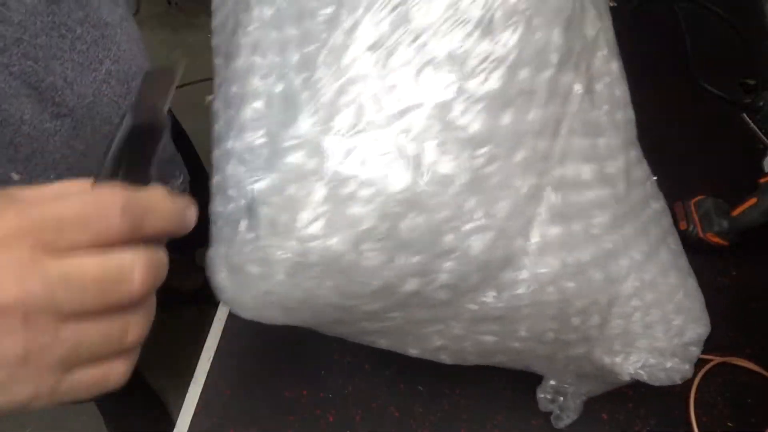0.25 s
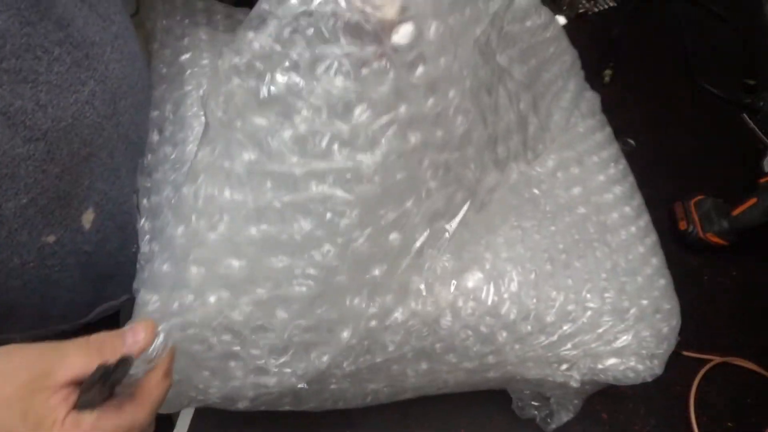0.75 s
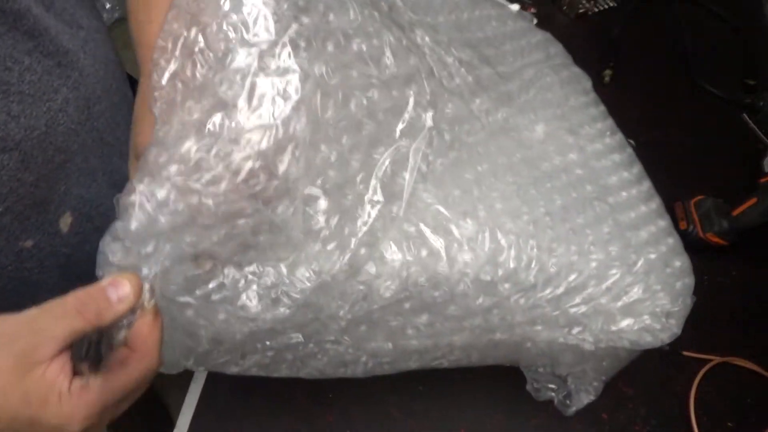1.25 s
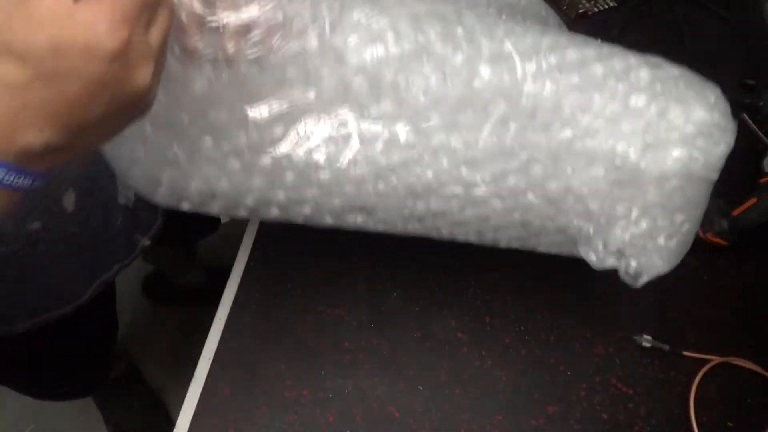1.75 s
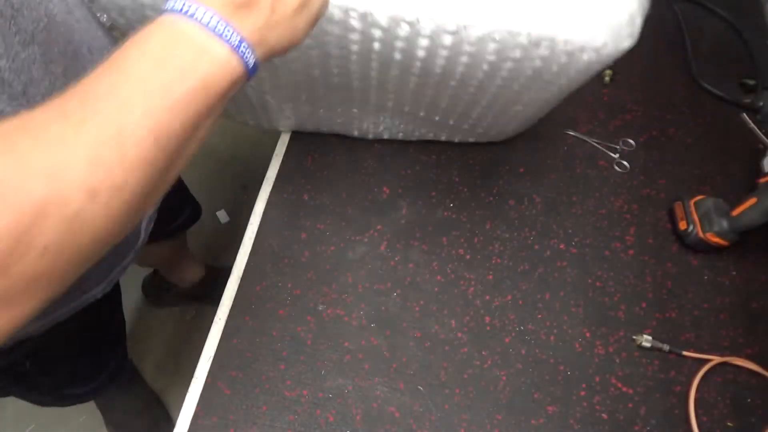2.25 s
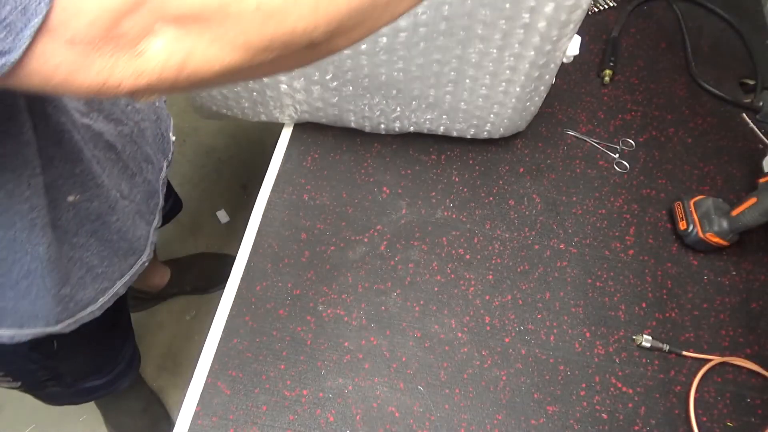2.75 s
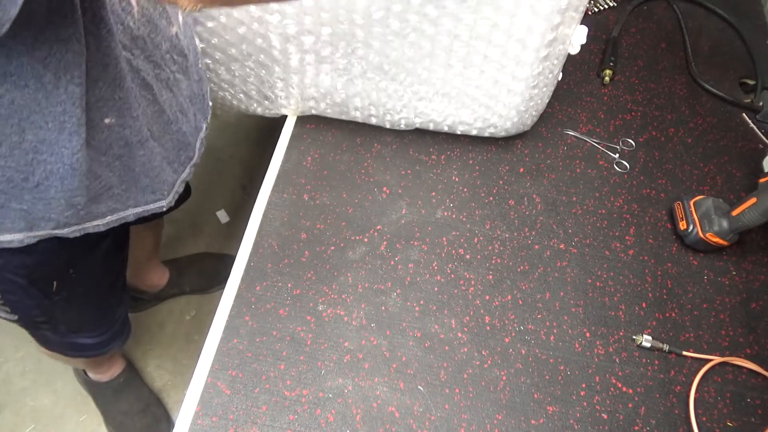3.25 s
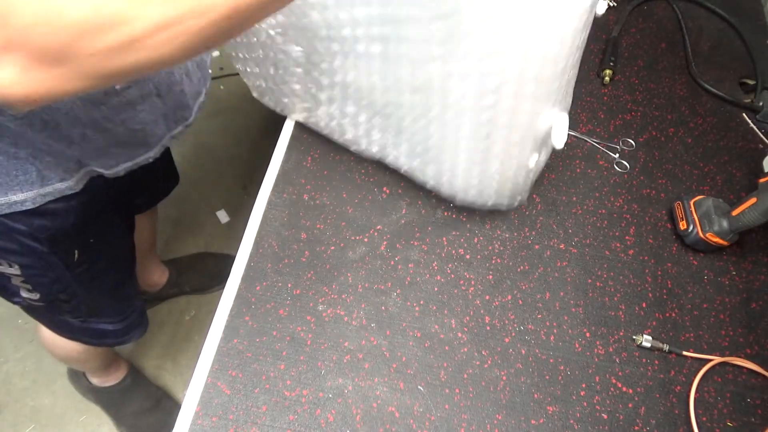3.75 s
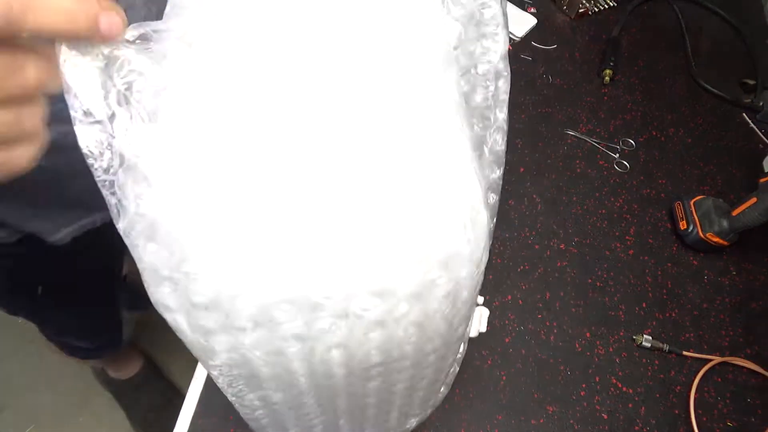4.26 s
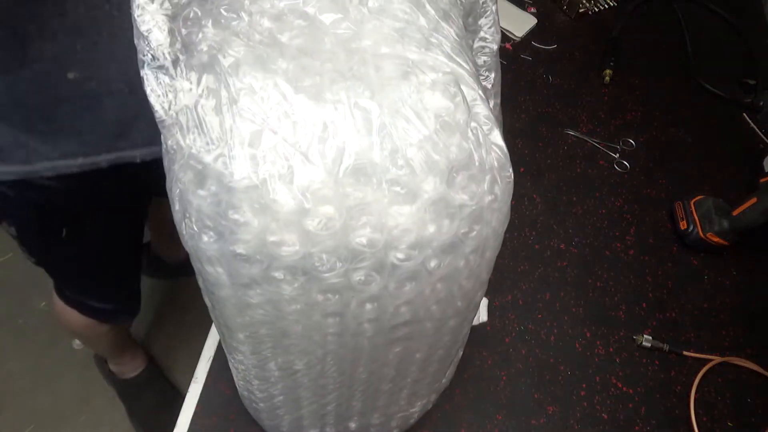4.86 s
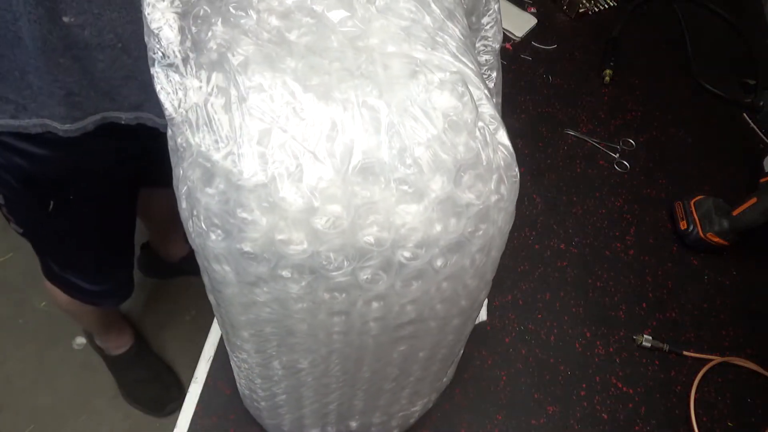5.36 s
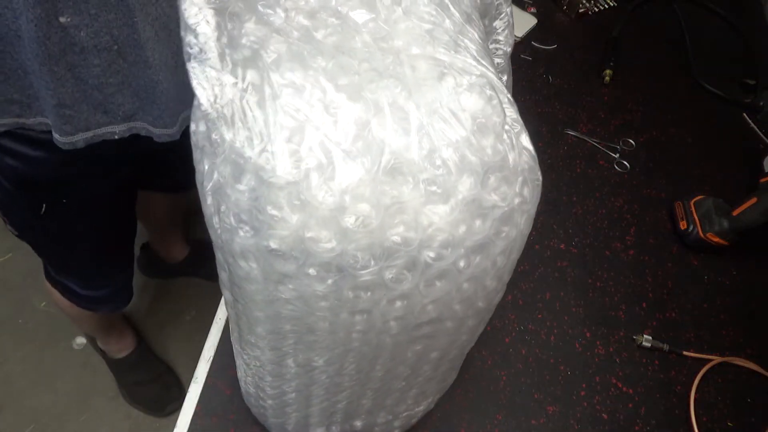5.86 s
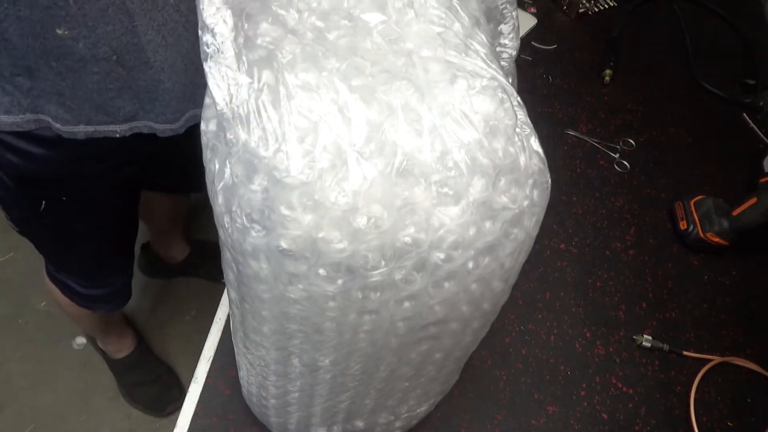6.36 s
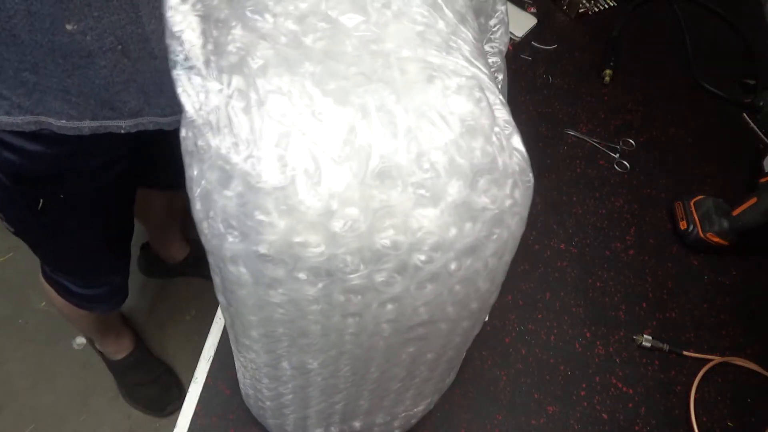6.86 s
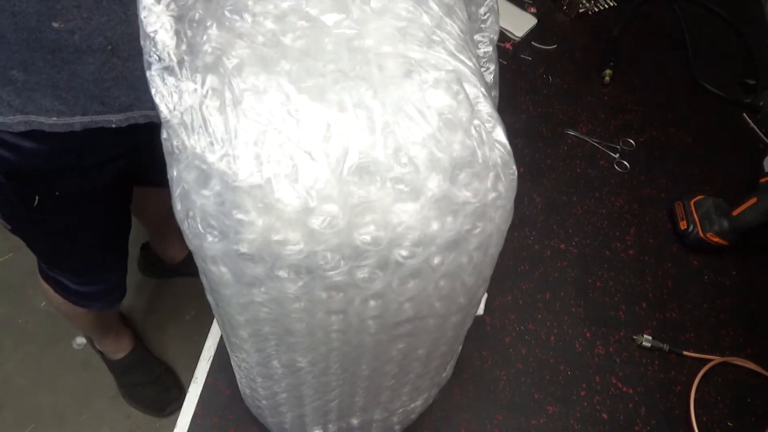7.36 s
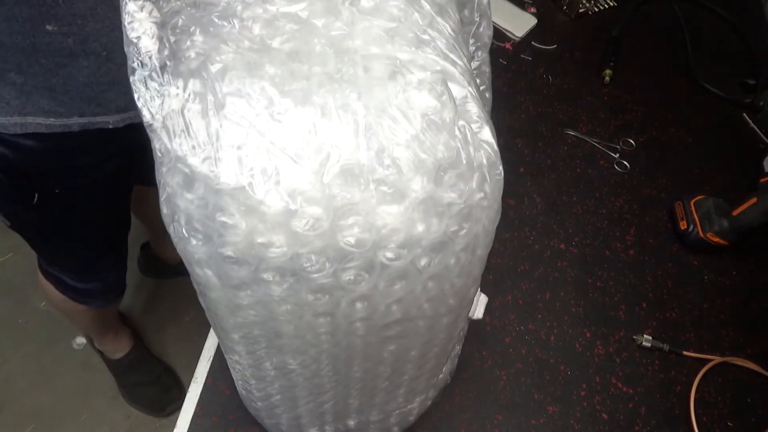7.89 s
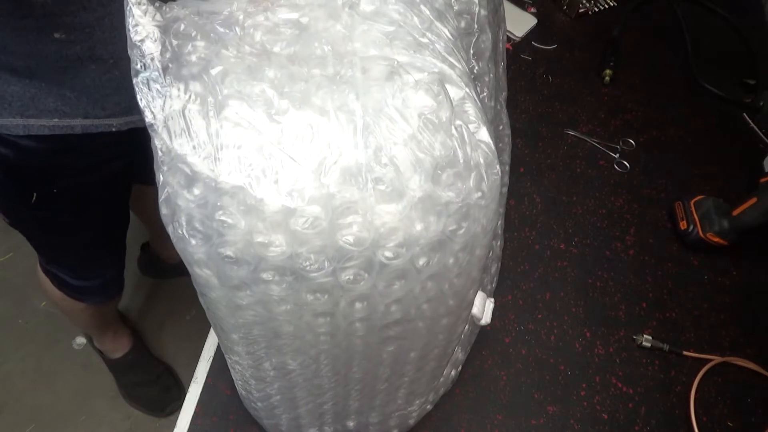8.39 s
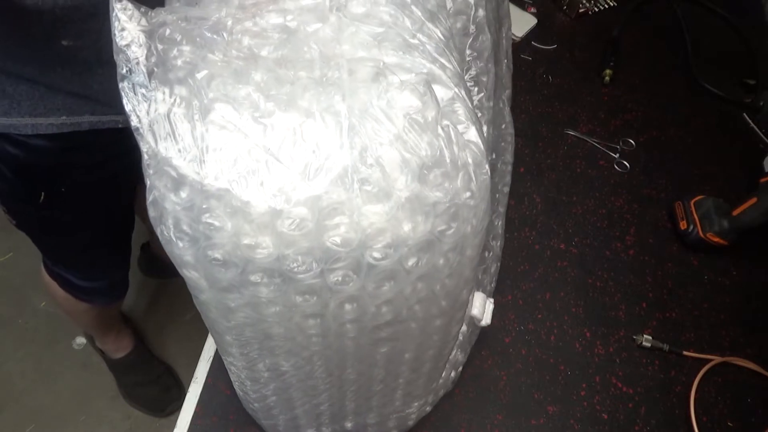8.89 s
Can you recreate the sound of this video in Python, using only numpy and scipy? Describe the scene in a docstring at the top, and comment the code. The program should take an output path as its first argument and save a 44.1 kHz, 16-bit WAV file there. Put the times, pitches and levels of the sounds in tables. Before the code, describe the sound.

Close, crisp plastic crinkling with sharp fold snaps and dull padded thumps, a near-still pause, then hard crackling tugs in a small workshop.

```python
"""Bubble wrap cut and pulled

Bubble wrap is cut open and pulled around a padded package, close by in a workshop with steady air noise.
Creases buckle in swarms of clicks (struck resonators); sheets slide with a hiss (dense, fluttering clicks).
Taut folds snap, single creases tick and bubbles ring: short pushes into damped resonators.
The package adds hollow body, a rub and dull thumps; random echoes and a short noise tail form the room."""
import sys
import numpy as np
from scipy import signal
from scipy.fft import rfft, irfft
from scipy.io import wavfile
from scipy.ndimage import uniform_filter1d, minimum_filter1d

SR = 44100
rng = np.random.default_rng(int(sys.argv[2]) if len(sys.argv) > 2 else 0)


def waveform_to_disk(signal):
    """Save audio, clipped to [-1, 1], as 16-bit WAV at the path in sys.argv[1]."""
    frames = np.transpose(np.atleast_2d(signal))
    scaled = np.clip(frames, -1, 1) * 32767
    samples = np.round(scaled).astype(np.int16)
    wavfile.write(sys.argv[1], SR, samples)


N = 402633
TIME = np.arange(N) / SR  # s


def undb(db):
    """Decibels to amplitude gain."""
    return 10 ** (np.asarray(db) / 20)


def unit(x):
    """Scale to rms 1."""
    return x / np.sqrt(np.mean(x ** 2))


def curves(rows):
    """Each column of a table, joined by straight lines in time."""
    start_s, *columns = np.transpose(rows)
    return [np.interp(TIME, start_s, column) for column in columns]


def colour(x, points, size=1024):
    """Causal minimum-phase filter through (freq_hz, gain_db) points; clicks keep their sharp front."""
    point_hz, point_db = np.transpose(points)
    freq_hz = np.maximum(np.fft.rfftfreq(size, 1 / SR), 1)
    gain_db = np.interp(np.log(freq_hz), np.log(point_hz), point_db)
    cepstrum = irfft(np.log(undb(gain_db)))
    cepstrum[1:size // 2] *= 2
    cepstrum[size // 2 + 1:] = 0
    impulse = irfft(np.exp(rfft(cepstrum)))
    return signal.fftconvolve(x, impulse[None], axes=-1)[:, :N]


def band(x, lo_hz, hi_hz):
    """Band-pass with second-order skirts, its top kept below half the sample rate."""
    edges_hz = [lo_hz, min(hi_hz, .48 * SR)]
    return signal.sosfilt(signal.butter(2, edges_hz, "band", fs=SR, output="sos"), x)


def ring(x, hz, cycles):
    """A patch swings for a few cycles and moves no net air; a unit click peaks near 1."""
    radius = np.exp(-hz / SR / cycles)
    angle = 2 * np.pi * hz / SR
    return signal.lfilter([.5, 0, -.5], [1, -2 * radius * np.cos(angle), radius * radius], x)


def clicks(per_s, spread_db, pan_db, rarest=0.089):
    """Random stereo clicks: many small and a few large; a negative spread gives many large and a few small."""
    when, rank, where = rng.random((int(per_s * N / SR), 3)).T
    polarity = (-1) ** np.arange(len(when))
    size = undb(-spread_db * np.log(rank + rarest)) * polarity
    side_db = pan_db * (where - .5)
    index = (when * N).astype(int)
    return np.array([np.bincount(index, size * undb(side * side_db), N) for side in (1, -1)])


def flutter(per_s, depth_db):
    """A gain that wanders at random, per_s steps a second."""
    steps = rng.standard_normal(int(per_s * N / SR) + 2)
    return undb(depth_db * np.interp(TIME * per_s, np.arange(len(steps)), steps))


def place(sounds, rows, pan_db=3.0):
    """Set peak-normalised sounds at the times and levels of their rows, each a little to one side."""
    out = np.zeros((2, N + SR))
    for sound, (start_s, level_db, *_) in zip(sounds, rows):
        i = max(int(start_s * SR), 0)
        side_db = np.array([[1], [-1]]) * pan_db * rng.uniform(-0.91, 1)
        out[:, i:i + len(sound)] += undb(level_db + side_db) * sound / np.abs(sound).max()
    return out[:, :N]


# workshop background spectrum: freq_hz, gain_db
AIR_SPECTRUM = [(25, -5), (100, -2), (200, -1.5), (800, -5), (2500, -4), (5200, -5.5), (11000, -24),
                (16000, -28)]


def air(level_db=-58.5):
    """Steady workshop noise, partly shared by the two sides; its lowest rumble differs between them."""
    noise = rng.standard_normal((2, N))
    shared = band(noise[::-1], 60, 20000)
    return undb(level_db) * unit(colour(noise + .5 * shared, AIR_SPECTRUM, size=8192))


# wrap dragging over the package as it is turned, later lying almost still: time_s, level_db
DRAG_LEVELS = [(0, -46.5), (0.47, -30), (0.69, -43.5), (0.94, -35), (1.69, -40), (2.15, -41.5), (2.36, -47),
               (2.49, -39), (3.53, -38.5), (3.72, -30), (4.07, -37.5), (4.34, -47.5), (4.81, -40.5),
               (4.93, -55.5), (7.2, -67), (8.48, -60), (9.12, -43.5)]
DRAG_BUCKLING, DRAG_BODY_DB, DRAG_FINE_DB = 0.23, -11.5, -15.5  # share 0-1; bands relative to the middle one
# tugs of the hands; rise_s and fall_s each span TUG_RANGE_DB, buckling is a share 0-1 (the rest slides),
# body_db and fine_db are hollow body and finest crackle relative to the middle band:
# peak_s, level_db, rise_s, fall_s, buckling, body_db, fine_db
HAND_TUGS = [(0.003, -22.5, 0.055, 0.096, 0.8, -6, -4.5), (0.177, -31.5, 0.075, 0.21, 0.67, -17, -11),
             (0.435, -23, 0.25, 0.27, 0.9, -12.5, -26), (0.718, -28, 0.023, 0.065, 0.6, -19, -18),
             (0.812, -24.5, 0.08, 0.054, 0.33, -16, -14), (0.928, -27, 0.16, 0.24, 0, -18, -21),
             (1.434, -29, 0.11, 0.086, 0.54, -17.5, -34), (1.517, -29.5, 0.052, 0.28, 0.86, -10.5, -25),
             (1.774, -25.5, 0.066, 0.12, 0.74, -17.5, -13), (2.397, -37.5, 0.016, 0.3, 0.5, -25, -30),
             (2.53, -34, 0.19, 0.19, 1, -5.5, -15), (2.694, -27.5, 0.042, 0.1, 0.58, -16, -11),
             (3.053, -30, 0.13, 0.063, 0, -13.5, -14), (3.464, -36.5, 0.55, 0.062, 0, -23, -15),
             (3.721, -33.5, 0.1, 0.12, 0.8, -16, -20), (4.036, -33, 0.32, 0.31, 0, 0, -17),
             (4.235, -31, 0.065, 0.096, 0.12, -15, -26), (4.526, -36, 0.33, 0.037, 0.68, -8, -7),
             (5.031, -49.5, 0.24, 0.067, 1, -9, -9), (5.17, -44, .049, 0.09, 0.97, -9, 2),
             (5.383, -47.5, 0.062, 0.34, 1, -11, -7), (5.944, -33, 0.053, 0.025, 1, -2, 0.5),
             (5.986, -22.5, 0.031, 0.096, 0.72, -7.5, -6), (6.043, -19, 0.073, 0.028, 0.81, -11, -10),
             (6.25, -48.5, 0.41, 0.17, 1, -17, -20), (6.505, -17, 0.022, 0.072, 0.42, -12.5, -13),
             (6.636, -20.5, 0.037, 0.046, 0.56, -20, -12.5), (6.885, -36.5, 0.41, 0.27, 0.62, -10, -15),
             (7.278, -31, 0.043, 0.075, 0.54, -13.5, -9), (7.333, -27.5, .013, 0.24, 0.94, -7, -10),
             (7.373, -15, 0.024, 0.071, 0.15, -16, -16), (7.738, -29, 0.029, 0.094, 0.9, 1, -13),
             (7.775, -29.5, 0.12, 0.12, 0.34, -12.5, -5.5), (7.98, -39, 0.22, 0.64, 0.5, -13.5, -11.5),
             (8.104, -26, 0.05, 0.056, 0.35, -15.5, -9.5), (8.149, -31.5, 0.045, 0.057, 0.2, -10, 1),
             (8.506, -40.5, 0.017, 0.27, 0.34, -16.5, -9), (8.587, -35.5, 0.082, 0.07, .3, -17, -22),
             (8.753, -38.5, 0.15, 0.25, 0.49, -15.5, -17), (8.987, -38.5, 0.23, 0.29, 0.4, -14, -13)]
TUG_RANGE_DB = 20


def effort():
    """Drag and tugs add up in power; the stronger one weighs more in how the film moves."""
    drag_db, = curves(DRAG_LEVELS)
    power = undb(drag_db) ** 2
    manner = np.outer([DRAG_BUCKLING, DRAG_BODY_DB, DRAG_FINE_DB], power)
    for peak_s, level_db, rise_s, fall_s, *own in HAND_TUGS:
        near = slice(*np.searchsorted(TIME, [peak_s - 2 * rise_s, peak_s + 2 * fall_s]))
        away = np.maximum((peak_s - TIME[near]) / rise_s, (TIME[near] - peak_s) / fall_s)
        tug = undb(level_db - TUG_RANGE_DB * away) ** 2
        power[near] += tug
        manner[:, near] += np.outer(own, tug)
    return 10 * np.log10(power), *(manner / power)


def avalanches(x, follow_db=-5, fall_s=.005):
    """Each click sets off a dying run of fine noise, its summed level follow_db relative to the click."""
    keep = np.exp(-2 / (fall_s * SR))
    power = signal.lfilter([0, 1 - keep], [1, -keep], x ** 2 + 1e-18)
    return x + undb(follow_db) * np.sqrt(power) * rng.standard_normal(N)


# creased film spectrum: freq_hz, gain_db
CREASE_SPECTRUM = [(40, -29), (130, -20), (250, -2.5), (400, -3), (750, 3.5), (1400, 2.5), (3500, 1.5),
                   (5500, 5), (7000, 0), (8500, -7), (13000, -10), (16000, -20)]


def swarm(per_s, spread_db, cycles, pan_db, count=16, long_db=-2.5):
    """Small creases ring at their own pitch, long ones at all pitches; the hand's pull evens out their power."""
    def creases():
        """Clicks and their avalanches for one group of creases."""
        return avalanches(clicks(per_s / count, spread_db, pan_db))

    long_creases = undb(long_db) * creases()
    total = 0
    for hz in np.geomspace(500, 13000, count):
        total = total + np.sqrt(hz) * unit(ring(creases() + long_creases, hz, cycles))
    total = unit(colour(total, CREASE_SPECTRUM))
    power = uniform_filter1d(np.mean(total ** 2, axis=0), size=1400)
    return total / np.sqrt(np.maximum(power, 0) + 0.15)


# sliding sheet spectrum: freq_hz, gain_db
SLIDE_SPECTRUM = [(40, -43), (130, -21.5), (230, -11), (400, -5.5), (720, -2.5), (1400, -3), (3000, -3),
                  (6500, -5.5), (8500, -13), (12500, -15.5), (16000, -37)]


def slide():
    """Bubble rows catch and slip on the sheet below: fine grain, low and high parts fluttering partly apart."""
    grain = colour(clicks(per_s=3500, spread_db=5, pan_db=2), SLIDE_SPECTRUM)
    low = signal.sosfiltfilt(signal.butter(2, 2500, fs=SR, output="sos"), grain)
    high = grain - low
    rubbed = low * flutter(45, 1.2) + high * flutter(45, 1.2)
    return unit(rubbed * flutter(90, 1.4))


def wrap():
    """Buckling creases mix with sliding sheets; hollow body and fine crackle follow the hands' effort."""
    level_db, buckling, body_db, fine_db = effort()
    buckling = np.clip(buckling, 0, 1)
    creases = unit(swarm(per_s=650, spread_db=9, cycles=1.0, pan_db=9))
    film = np.sqrt(buckling) * creases + np.sqrt(1 - buckling) * slide()
    middle = unit(band(film, 1430, 7400))
    body = unit(band(film, 135, 1000)) * undb(body_db)
    fine = unit(band(film, 8200, 21000)) * undb(fine_db)
    # outer bands inverted: all three join without a notch
    return (middle - body - fine) * undb(level_db)


# single sharp creases, each ticking once: start_s, level_db
CREASE_TICKS = [(0.032, -4), (0.15, -9.5), (0.308, -9), (0.3564, -10), (0.379, -7), (0.409, -4),
                (0.4236, -7), (0.433, -9), (0.4462, -11), (0.6163, -7), (0.732, -11), (0.758, -7.5),
                (0.7912, -8), (1.467, -10), (1.5474, -14), (1.7518, -8), (1.8184, -4), (1.8374, -10),
                (2.0593, -15), (2.6978, -10), (3.189, -10), (3.7527, -12), (4.484, -12.5), (5.4495, -22),
                (5.7045, -22.5), (5.7728, -22.5), (5.8803, -13.5), (5.9255, -14), (6.799, -24),
                (7.2805, -12), (7.7005, -13.5), (7.9035, -12), (8.9875, -21)]


def ticks(hz=4200, cycles=0.29, crack_db=-9):
    """A sharp crease gives way in one step, with a thin bright crack; each has its own pitch."""
    push = signal.unit_impulse(SR // 100)
    sounds = []
    for octave in rng.uniform(-.35, .35, len(CREASE_TICKS)):
        swing = colour(ring(push, hz * 2 ** octave, cycles)[None], CREASE_SPECTRUM)[0]
        crack = np.diff(signal.unit_impulse(len(swing)), prepend=0) / 2
        sounds.append(swing / np.abs(swing).max() + undb(crack_db) * crack)
    return place(sounds, CREASE_TICKS)


# snapping fold spectrum: freq_hz, gain_db
FOLD_SPECTRUM = [(60, -43), (200, 19.5), (600, 16), (2000, 1), (6500, 3), (8500, 0), (12500, -0.5),
                 (16000, -7.5)]
# taut folds that snap, rattle relative to the first push: start_s, level_db, pitch_hz, rattle_db
FOLD_SNAPS = [(0.0494, -5, 3120, -8.5), (0.249, -7.5, 2670, -11), (0.3339, -2.5, 2830, -7.5),
              (0.521, 1, 4170, -13), (0.556, -4, 4950, -5), (0.5727, -9, 3250, -3.5),
              (0.8324, -3, 3770, -14), (1.137, -16.5, 4600, -5), (1.3223, -6, 3240, -2.5),
              (1.6334, -1.5, 2870, -14), (1.672, -11, 2170, -8.5), (1.805, -2.5, 2390, -17),
              (1.869, -13, 2870, -10), (1.9915, -2.5, 2370, -10.5), (2.1778, -9.5, 2940, -5.5),
              (2.519, -5.5, 1850, -15), (2.554, -8.5, 3970, 1), (2.63, -12.5, 3470, -13),
              (2.7924, -15.5, 3350, -6), (2.8458, -7.5, 4060, -7), (3.706, -4, 5500, -6.5),
              (4.519, -13, 3200, -4.5), (4.6524, -13, 2800, -9), (4.726, -16.5, 2940, 4),
              (4.784, -8, 2960, -4), (4.8499, -15, 4900, -9), (5.157, -22.5, 2620, -3.5),
              (5.3721, -16, 3120, -7), (5.976, -0.5, 2700, -10), (5.989, -3.5, 2840, -3),
              (6.232, -23.5, 3330, -12), (6.419, -11, 3700, -7.5), (6.4747, -1.5, 3000, -5.5),
              (6.616, -1, 2900, -19), (6.626, -12, 4600, -2), (6.8665, -10.5, 4650, -2.5),
              (6.965, -14, 3260, -5.5), (7.004, -20, 1660, -7.5), (7.2646, -13, 3900, 0.5),
              (7.3248, -2.5, 2550, -4.5), (7.4143, -7, 3320, -6), (7.544, -16, 5140, -8),
              (7.7323, -9.5, 2250, -21), (7.7445, -10.5, 3400, -18)]


def snaps(crack_db=-20, rattle_s=0.007, bubble_db=-11, size=2048):
    """A taut fold flips with a crack, rings an air pocket on either side and briefly shakes its neighbours."""
    out, t = np.zeros((2, N + size)), np.arange(size) / SR
    ring_s, bubble_cycles = .00015, 2.2
    for start_s, level_db, hz, rattle_db in FOLD_SNAPS:
        push = rng.choice([-1, 1], size) * (rng.random(size) < .03)
        push = push * np.exp(-t / rattle_s) * undb(rattle_db)
        push[0] = 1
        pan_db = 2 * rng.standard_normal()
        pitches_hz = hz * 2 ** (np.array([-1, 1]) * rng.random(2) / 2)
        bubbles = sum(ring(push, f, bubble_cycles) for f in pitches_hz)
        snap = ring(push, hz, hz * ring_s) + undb(crack_db) * push + undb(bubble_db) * bubbles
        # small folds give thin ticks, large ones dull pops
        snap = band(snap, hz / 4, hz * 5) / (1 + 2 * undb(bubble_db))
        i = max(int(start_s * SR), 0)
        side_db = np.array([[pan_db], [-pan_db]]) / 2
        out[:, i:i + size] += undb(level_db + side_db) * snap
    return colour(out[:, :N], FOLD_SPECTRUM)


def scuff(at_s=0.42, width_s=0.048, hz=900, cycles=1.8, level_db=-33.0):
    """A palm rubs the taut padding as the package is swung round; dense clicks make it resound hollowly."""
    rubbed = unit(ring(clicks(per_s=1700, spread_db=-3, pan_db=0), hz, cycles))
    return undb(level_db) * rubbed * np.exp(-((TIME - at_s) / width_s) ** 2)


# jolts of the padded package: start_s, level_db, pitch_hz
PACKAGE_JOLTS = [(0.521, -15, 850), (1.992, -15, 546), (2.519, -13.5, 644), (2.846, -16.5, 700),
                 (6.034, -26, 456), (6.506, -35, 443), (6.622, -22, 340), (7.378, -22, 434),
                 (7.747, -22.5, 417), (8.147, -22.5, 402)]


def jolts(cycles=0.8, rumble_db=-39, rumble_s=0.028):
    """Air-filled padding gives a dull, well damped thump when the package is tugged, and rumbles briefly."""
    thumps, shake = np.zeros(N), np.zeros(N)
    push = signal.unit_impulse(SR // 4)
    decay = np.exp(-TIME[:len(push)] / rumble_s)
    for start_s, level_db, hz in PACKAGE_JOLTS:
        i = int(start_s * SR)
        thumps[i:i + len(push)] += undb(level_db) * ring(push, hz, cycles)
        shake[i:i + len(push)] += undb(level_db + rumble_db) * decay
    rumble = unit(band(rng.standard_normal(N), 55, 290))
    return band(thumps, 78, 6000) + shake * rumble


# taut bubbles that flip and ring: start_s, level_db, pitch_hz
BUBBLE_PINGS = [(0.859, -7, 2770), (2.0503, -24, 5200), (3.0442, -7, 5500), (3.1178, -28, 1780),
                (7.029, -12.5, 5700), (7.044, -3.5, 4180), (7.2331, -13, 4470), (7.338, -7, 4330)]


def pings(cycles=1.55, crack_db=-1, wobble_db=-17, wobble_s=0.0066):
    """A bubble's cap flips with a small crack, rings at its own pitch and wobbles to rest."""
    t, sounds = TIME[:SR // 50], []
    for _, _, hz in BUBBLE_PINGS:
        push = rng.standard_normal(len(t)) * (rng.random(len(t)) < .1)
        push = push * np.exp(-t / wobble_s) * undb(wobble_db)
        push[0] = 1
        crack = undb(crack_db) * np.diff(push, prepend=0)
        sounds.append(colour((ring(push, hz, cycles) + crack)[None], CREASE_SPECTRUM)[0])
    return place(sounds, BUBBLE_PINGS)


def near_echoes(x, early_db=-12.0, early_s=0.0025, count=8):
    """Quick echoes from package, arms and floor; patterns crossfade in turn as these move."""
    t = TIME[:SR // 25]
    out = 0
    for k in range(count):
        echo = rng.standard_normal((2, len(t))) * (rng.random(len(t)) < .06)
        echo = echo * np.exp(-t / early_s) * (t > .0007)
        echo = unit(echo + 0.19 * echo[::-1]) / np.sqrt(len(t))  # the two sides partly share it
        distance = np.abs((5 * TIME + k) % count - count / 2)  # 5 patterns per second
        fade = np.sqrt(np.maximum(1 - distance, 0))
        out = out + signal.oaconvolve(x * fade, echo, axes=-1)[:, :N]
    return undb(early_db) * out


def room(x, tail_db=-11, low_t60_s=0.15, high_t60_s=0.17):
    """Direct sound, near echoes, then a short diffuse tail of decaying noise."""
    t = TIME[:SR // 2]
    noise = rng.standard_normal((2, len(t)))
    low = band(noise + .5 * noise[::-1], 100, 2000) * undb(-60 * t / low_t60_s)
    high = band(rng.standard_normal((2, len(t))), 1370, .48 * SR) * undb(-60 * t / high_t60_s)
    onset = np.minimum(t / 0.0058, 1)
    tail = unit((low + high) * onset) / np.sqrt(len(t))
    return x + near_echoes(x) + undb(tail_db) * signal.fftconvolve(x, tail, axes=-1)[:, :N]


def scene():
    """All sources in the room over the air; the hands start a little to the left and move to the middle."""
    left_db, = curves([(0, 1.1), (2.7, 1.4), (3.1, 0.13)])  # time_s, left_minus_right_db
    sources = wrap() + snaps() + ticks() + pings() + jolts() + scuff()
    return room(sources * undb(np.array([left_db, -left_db]) / 2)) + air()


def record(dry, ceiling=0.53, top_hz=16000):
    """A fast limiter, shared by both sides, holds down the highest peaks; a low-pass cuts the top."""
    gain = ceiling / np.maximum(np.abs(dry).max(axis=0), ceiling)
    gain = uniform_filter1d(minimum_filter1d(gain, size=61), size=61)
    return signal.sosfilt(signal.ellip(8, .2, 70, top_hz, fs=SR, output="sos"), dry * gain)


dry = scene()
out = record(dry)
waveform_to_disk(out)
```